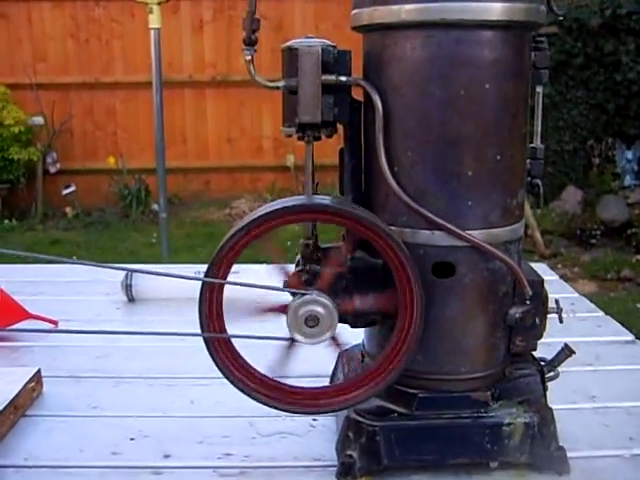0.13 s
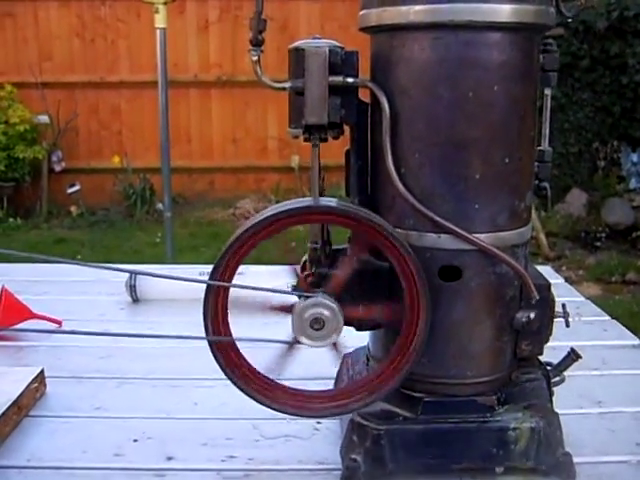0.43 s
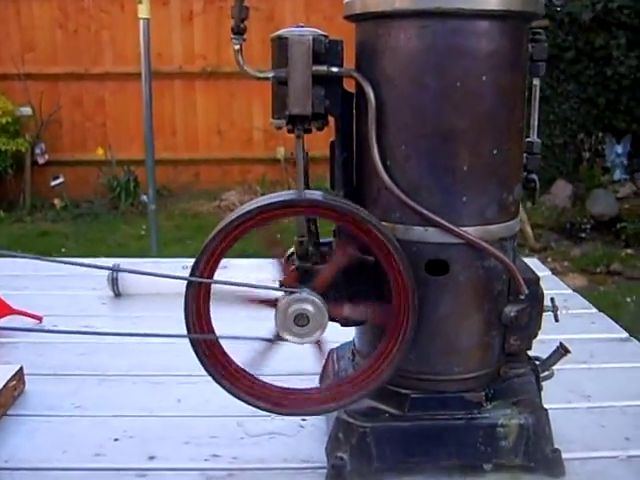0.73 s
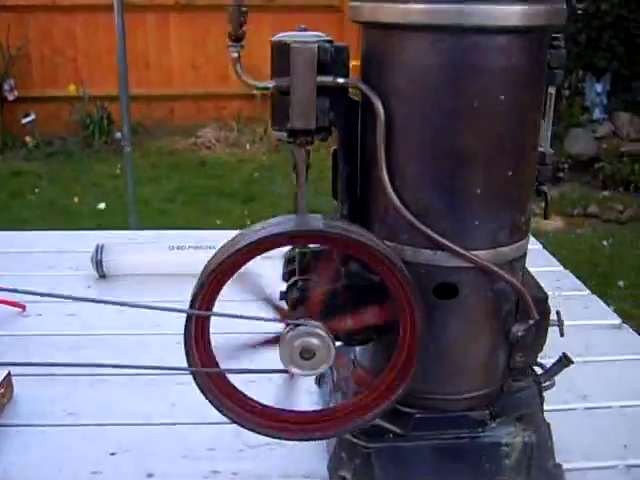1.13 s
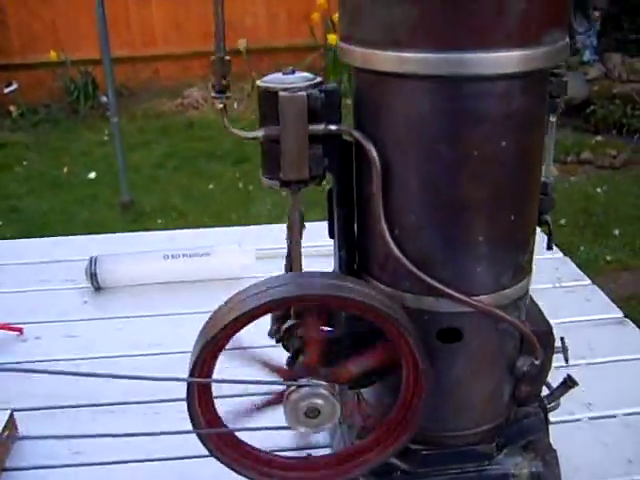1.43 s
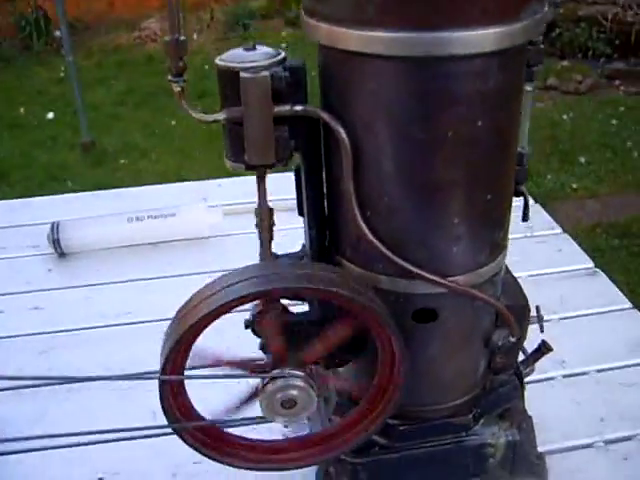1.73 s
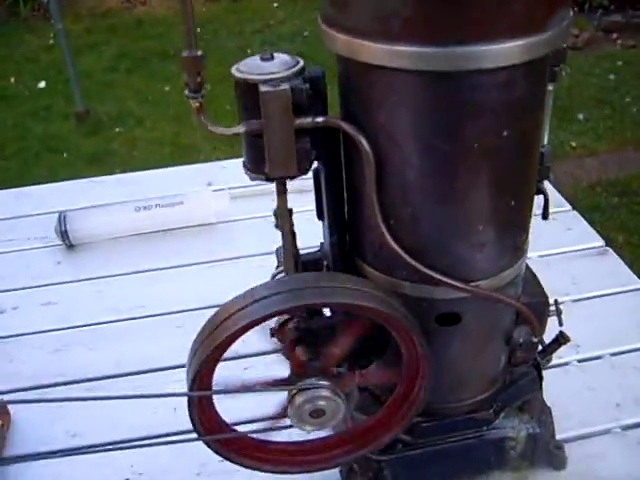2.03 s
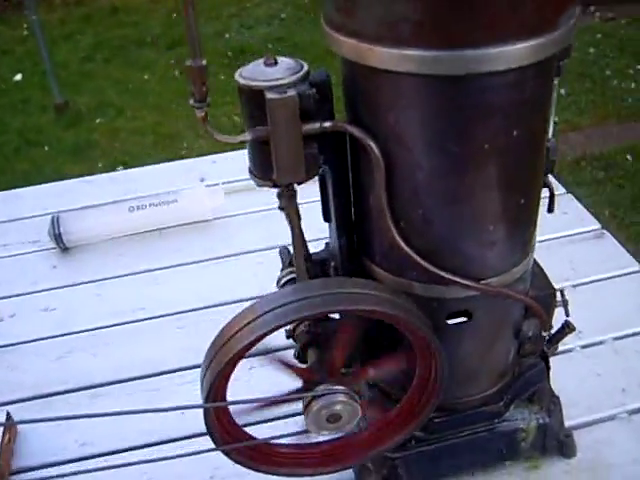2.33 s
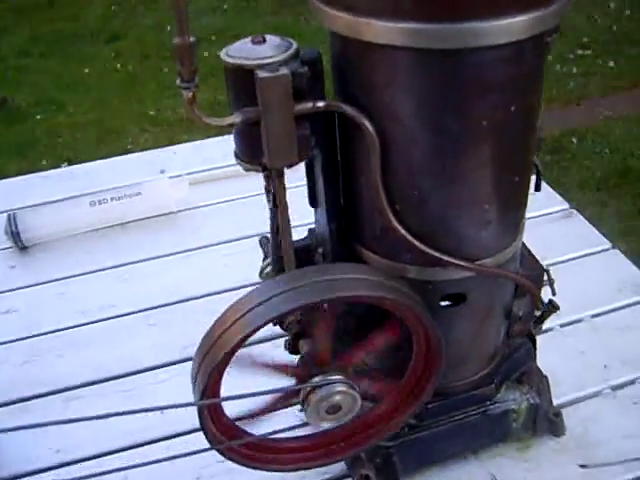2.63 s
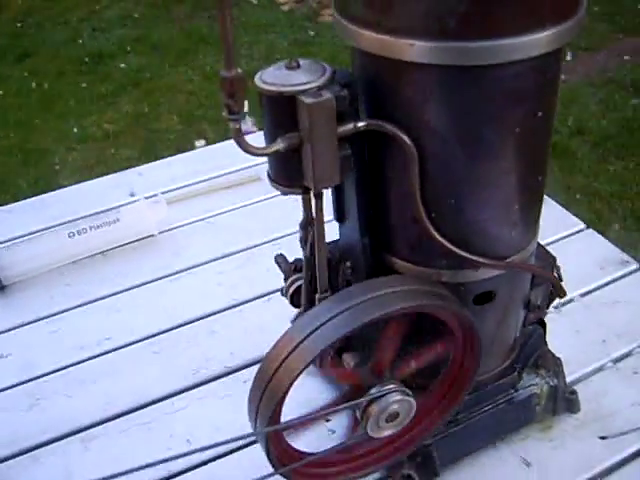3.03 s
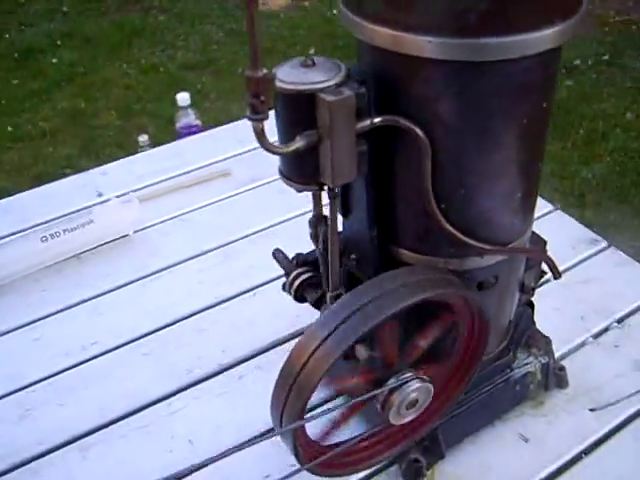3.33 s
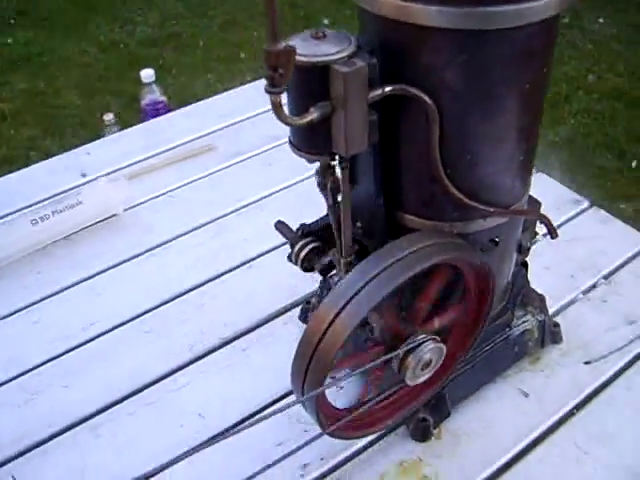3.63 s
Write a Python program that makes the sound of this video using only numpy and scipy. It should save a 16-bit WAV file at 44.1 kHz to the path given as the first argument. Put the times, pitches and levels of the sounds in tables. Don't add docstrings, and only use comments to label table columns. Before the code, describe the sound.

Fast steam puffs from a little engine on a garden table, ticking, clacking and softly droning.

```python
import sys
import numpy as np
from scipy import signal
from scipy.fft import rfft, irfft, next_fast_len
from scipy.io import wavfile
from scipy.ndimage import uniform_filter1d, map_coordinates

SR = 44100
rng = np.random.default_rng(int(sys.argv[2]) if len(sys.argv) > 2 else 0)


def natural_amplitude(level_db):
    exponent = np.asarray(level_db, float) / 20
    return 10 ** exponent


def output_pcm(signal):
    pcm = np.clip(np.atleast_2d(signal).T, -1, 1) * 32767
    wavfile.write(sys.argv[1], SR, np.round(pcm).astype(np.int16))


N = 166257

# time [s], turn_count [turns]
CRANK = [(0, -.18), (.3983, 4), (1.3468, 14), (2.2842, 24), (3.4963, 37), (3.77, 39.94)]


def unit(x):
    return x / np.sqrt(np.mean(x ** 2) + 1e-20)


def along(points, hz):
    point_hz, value = np.transpose(points)
    return np.interp(np.log(hz + 1), np.log(point_hz + 1), value)


def slopes(points):
    return lambda hz: natural_amplitude(along(points, hz))


def bands(rows):
    def gain(hz):
        hz = np.minimum(hz, 7650)
        return np.sqrt(sum(natural_amplitude(2 * db) / (1 + (2 * (hz - centre) / wide) ** 2) ** 2
                           for centre, wide, db in rows))
    return gain


def curves(rows):
    s, *columns = np.transpose(rows)
    return [np.interp(np.arange(N) / SR, s, column) for column in columns]


def wobble(rate):
    return map_coordinates(rng.standard_normal(size=4000), [np.arange(N) * rate / SR])


def filtered(x, response):
    m = next_fast_len(N + SR // 2)
    return irfft(rfft(x, m) * response(np.fft.rfftfreq(m, 1 / SR)), m)[..., :N]


def rush(spectrum, patchy_db, tilt_db=0):
    z = signal.stft(rng.standard_normal(N), nperseg=256)[2]
    patches = uniform_filter1d(uniform_filter1d(rng.standard_normal(z.shape), 3, 0), 5, 1)
    noise = signal.istft(z * natural_amplitude(patchy_db * unit(patches)), nperseg=256)[1][:N]
    return unit(filtered(noise, lambda hz: spectrum(hz) * natural_amplitude(tilt_db * np.log2((hz + 1) / 4000))))


def snap(size):
    noise = rng.standard_normal(size + 8)
    return np.convolve(noise, [1, 1, 1, 0, -1, -1, -1], 'valid')[:size] / 2


def strikes(rows, modes, crack, crack_s=0.012, glide=0, rise_s=0.00047, glide_s=0.0009):
    out, t = np.zeros(N + SR), np.arange(SR // 10) / SR
    bent_t = t + glide * glide_s * (1 - np.exp(-t / glide_s))
    for s, db in rows:
        draw = rng.standard_normal((len(modes), 2))
        blow = crack * natural_amplitude(-60 * t / crack_s) * snap(len(t))
        for (hz, mode_db, t60), (louder, sharper) in zip(modes, draw):
            fade = natural_amplitude(mode_db + 2.0 * louder - 60 * t / t60)
            blow += fade * np.sin(2 * np.pi * hz * (1 + 0.019 * sharper) * bent_t)
        blow *= 1 - np.exp(-t / rise_s)
        out[max(round(s * SR), 0):][:len(t)] += natural_amplitude(db) * blow / np.abs(blow).max()
    return out[:N]


def port(turns, opens, opening, shuts, shutting, sag_db):
    u = turns - opens + 2
    since_open, span = u % 1, shuts - opens
    closing = 1 - (since_open - span) / shutting
    gate = np.clip(np.minimum(since_open / opening, closing), 0, 1) ** 2
    scatter_db = 0.8 * rng.standard_normal(50)[u.astype(int)]
    return gate * natural_amplitude(-sag_db * since_open / span + scatter_db)


def steam():
    # time [s], level [dB], weak_puff [dB], camera_angle [0 front - 1 - 2 side - 3 back]
    heard = [(0, -43.5, -3, 0.065), (.6, -44.5, -1.5, 0.14), (1.0, -43.5, -4.5, 0.028),
             (1.35, -43.5, -2.5, 0.14), (1.55, -44, -5.5, 0.67), (1.7, -44.5, -4, 1.1),
             (1.85, -43, -6.5, 0.96), (2.3, -44.5, -5, 1.48), (2.55, -44.5, -3, 1.64),
             (2.9, -44, -4.5, 2.1), (3.15, -41, -5.5, 2.58), (3.4, -42, -6.5, 2.82), (3.77, -40, -7, 2.9)]
    # opens_at [turn], opening [turns], shuts_at [turn], shutting [turns], sag [dB]
    strong_port = (0.81, 0.029, 1.179, 0.051, 1.1)
    weak_port = (0.3, 0.054, 0.66, 0.098, 5.7)
    # pitch [Hz], width [Hz], level [dB]
    front = [(1830, 360, -10), (3160, 480, -2), (3726, 610, 1.5), (4190, 490, -5), (5370, 410, -9.5),
             (6375, 830, -2), (7650, 430, -8)]
    half = [(1940, 290, -9), (3053, 890, 1), (4180, 600, -5), (5190, 990, -2), (6250, 810, -11),
            (7150, 1060, 0)]
    side = [(2070, 230, -12.5), (2910, 780, -5.5), (4090, 920, -9.5), (5100, 1100, -6.5), (6590, 770, 1.5),
            (7328, 516, -2.5)]
    back = [(2020, 390, -11), (2860, 650, -4.5), (3300, 330, -7), (4180, 610, -8), (5070, 700, -4.5),
            (5870, 580, -10), (6560, 490, -3), (6980, 660, -3), (7451, 417, 1.5)]
    # pitch [Hz], level [dB per Hz]
    chuff_body = [(210, -32), (350, -9), (432, -9), (485, -3.5), (599, -1.5), (1020, -1.5), (1110, -1.5),
                  (2600, -9), (3380, -38.5), (5720, -120)]

    turns, = curves(CRANK)
    level_db, weak_db, angle = curves(heard)
    angle = np.clip(angle, 0, 3)
    shares = [np.sqrt(np.clip(1 - np.abs(angle - view), 0, 1)) for view in range(4)]

    def jet(tilt_db):
        return sum(share * rush(bands(colour), 0.5, tilt_db)
                   for share, colour in zip(shares, (front, half, side, back)))

    strong, weak = port(turns, *strong_port), port(turns, *weak_port)
    spit = natural_amplitude(1.7 * np.clip(wobble(700), -2, 2) + 0.7 * wobble(120))
    leak_db, weak_tilt_db = -21.5, -2
    hiss = spit * (strong * jet(0) + (weak * natural_amplitude(weak_db) + natural_amplitude(leak_db)) * jet(weak_tilt_db))
    flow = 1 + strong + 1.1 * weak
    chuff = unit(flow * natural_amplitude(1.7 * wobble(150)) * rush(slopes(chuff_body), 1.7))
    return natural_amplitude(level_db + 2.0) * hiss + natural_amplitude(-58) * chuff


def drone():
    # time [s], speed [turns per s]
    shaft_speed = [(0, 16.28), (.65, 16.26), (1.8, 16.15), (3.05, 16.09), (3.77, 16.07)]
    # time [s], nearness [0-1]
    nearness = [(0, 0.03), (.65, 0), (1.2, 0.43), (1.8, 0.76), (2.4, 0.8), (3.05, 1), (3.77, 0.82)]
    # multiple [of shaft speed], level [dB]
    far_orders = [(1, -19), (2, -18), (3, -13), (4, 1), (5, -9.5), (6, -13), (7, -14), (8, -3), (9, -12.5),
                  (10, -13.5), (11, -16), (12, -1), (13, -5), (14, -5), (15, -5.5), (16, -1.5), (17, -14.5),
                  (18, 1.5), (19, -5.5), (20, -2), (21, -3), (22, -21), (23, -5), (24, -9.5)]
    near_orders = [(1, -28), (2, -29), (3, -25), (4, -13), (5, -19), (6, -25), (7, -26), (8, -15.5),
                   (9, -20), (10, -19.5), (11, -15.5), (12, -6.5), (13, -9.5), (14, -6.5), (15, -9),
                   (16, 0.5), (17, -17.5), (18, -9), (19, -2.5), (20, -15.5), (21, -11), (22, -19),
                   (23, -14), (24, -21)]
    # pitch [Hz], level [dB per Hz]
    table_rumble = [(12, -43), (20, -17), (54, 1), (151, -7.5), (195, 3.5), (303, 0), (426, -2.5),
                    (492, 3.5), (600, -12), (780, -39), (1320, -120)]
    # pitch [Hz], level [dB]
    distant_hum = [(470, -64), (441, -70)]

    (speed,), (near,) = curves(shaft_speed), curves(nearness)
    near = np.clip(near, 0, 1)
    shaft_angle = 2 * np.pi * np.cumsum(speed) / SR
    hum = np.zeros(N)
    for (k, far_db), (_, close_db) in zip(far_orders, near_orders):
        hum_db = (1 - near) * (far_db - 69.5) + near * (close_db - 58.5) + 0.9 * wobble(3.455)
        hum += natural_amplitude(hum_db) * np.sin(k * shaft_angle + 1.35 * k * k)

    hoot_s, rise_s, sag_hz_per_s = 3.2, 0.3, 11
    t = np.arange(N) / SR - hoot_s
    hoot = sum(natural_amplitude(db + 0.8 * wobble(8.2)) * np.sin(2 * np.pi * (hz - sag_hz_per_s * t / 2) * t)
               for hz, db in distant_hum)
    hoot = np.clip(t / rise_s, 0, 1) * hoot
    rumble = natural_amplitude(-69.5 + 7 * near + 0.85 * wobble(5.6)) * rush(slopes(table_rumble), 0.96)
    return hum + hoot + rumble


def pops():
    # time [s], peak [dB], low_thud [dB]
    slugs = [(0.002, -29, -7.5), (0.0501, -24.5, -12.5), (0.0567, -29, -13), (0.0995, -31.5, -2),
             (0.1449, -23, -11.5), (0.1955, -25, -13), (0.2095, -35, -14), (0.2568, -35, -12),
             (0.7634, -20.5, -21), (0.786, -33, -20), (0.9586, -30.5, -22), (1.0558, -32, -15),
             (1.3538, -27, -16)]
    # pitch [Hz], level [dB], fade_t60 [s]
    nozzle = [(3250, -5, .006), (3750, 0, .008), (4250, -5, .006), (5300, -13, .004), (7300, -12, .004)]
    chimney = [(840, 2, 0.008), (1280, 1.5, 0.0097), (1560, -0.5, 0.008)]
    snaps = [(s, db - 5.5) for s, db, _ in slugs]
    thuds = [(s, db + thud_db - 0.5) for s, db, thud_db in slugs]
    return (strikes(snaps, nozzle, crack=0.19, crack_s=0.0038, rise_s=0.0005)
            + strikes(thuds, chimney, crack=0.069))


def crank():
    # pitch [Hz], level [dB], fade_t60 [s]
    bearing = [(906.5, 0, 0.03), (1037.6, -1, 0.034), (1403, -9, 0.012), (2040, -10, 0.008)]
    valve_gear = [(2106, 1.5, 0.023), (1870, 0, 0.018)]
    whistle = [(850, 0, .014)]
    pinched_steam = [(2790, 0, .02)]
    # time [s], level [dB]
    squeak_heard = [(0, -7), (.9, -4), (1.3, -3), (1.95, -4), (2.2, -5), (3.77, -9)]
    # time [s], peak [dB]
    loud_chirps = [
        (0.5526, -53),
        (1.8243, -44),
        (1.919, -41),
        (2.377, -46),
        (2.9442, -42.5),
        (3.016, -51),
        (3.4057, -45),
    ]

    s, turns = np.transpose(CRANK)
    k, scatter = np.arange(40), rng.standard_normal((40, 5))

    def at(turn):
        return np.interp(k + turn, turns, s)

    facing_db = 3.5 * (np.clip(k / 14, 0, 1) - 1)
    heard_db = np.interp(at(0), *np.transpose(squeak_heard))
    knocks = zip(at(0.243), -41 + facing_db + 1.5 * scatter[:, 0])
    ticks = zip(at(0.635), -46 + 1.5 * scatter[:, 1])
    chirps = zip(at(0.075), -50 + 2.5 * scatter[:, 2])
    squeaks = zip(at(0.228), -40.5 + heard_db + 2.5 * scatter[:, 3])
    pinches = zip(at(0.17), -47 + 2 * facing_db + 1.5 * scatter[:, 4])
    return (strikes(squeaks, whistle, crack=0.22, crack_s=0.0079, glide=2.4, glide_s=0.002, rise_s=0.0014)
            + strikes(pinches, pinched_steam, crack=0.3, rise_s=0.001)
            + strikes(knocks, bearing, crack=0.55, glide=0.3, rise_s=0.0009)
            + strikes(ticks, bearing, crack=1.0)
            + strikes([*chirps, *loud_chirps], valve_gear, crack=0.35, rise_s=0.0022))


def belt():
    # time [s], peak [dB], rebound_after [s], clip_ring [dB]
    pulley_hits = [
        (0.2842, -33.5, 0.013, -18),
        (0.8705, -34.5, .012, -16),
        (1.4612, -37, .011, -4),
        (2.0438, -32.5, .011, -5),
        (2.6155, -31, .012, -13),
        (3.1887, -29, .0105, -6),
        (3.7605, -33.5, .011, -12),
    ]
    # time [s], peak [dB]
    rim_hits = [
        (0.4858, -25),
        (1.0807, -25.5),
        (1.6688, -25.5),
        (2.2371, -27.5),
        (2.8191, -25.5),
        (3.383, -23.5),
    ]
    # pitch [Hz], level [dB], fade_t60 [s]
    frame_modes = [(562, -7, 0.028), (620, -5, 0.03), (715, -8, 0.014), (1050, -14, .01),
                   (1393, -11, 0.014), (1650, -14, .01), (1960, -9, .013), (2150, -11, .01),
                   (2850, -11, 0.01)]
    clip_modes = [(5820, -2, 0.0077), (6170, -4, .01)]
    rim_modes = [(627, -14, 0.027), (2110, -3, 0.013), (2697, 3.5, 0.008), (3250, -1.5, 0.0093),
                 (4740, -2.5, 0.0067), (5850, 0.5, 0.0075), (7080, -9.5, 0.0068)]

    thumps = [(s + k * gap_s, db + 0.5 - 3 * k * k, clip_db)
              for s, db, gap_s, clip_db in pulley_hits for k in range(3)]
    clacks = [(s + k * 0.002, db - 0.5 - 6 * k) for s, db in rim_hits for k in range(2)]
    thuds = [(s, db) for s, db, _ in thumps]
    clip_rings = [(s, db + clip_db) for s, db, clip_db in thumps]
    return (strikes(thuds, frame_modes, crack=0.67, rise_s=0.0018)
            + strikes(clip_rings, clip_modes, crack=0, rise_s=0.00058)
            + strikes(clacks, rim_modes, crack=1.0, crack_s=0.0098, rise_s=0.0008))


def garden(x):
    # pitch [Hz], fade_t60 [s]
    echo_fade = [(200, 0.04), (2000, 0.066), (8000, 0.028)]
    hz, t, z = signal.stft(rng.standard_normal(SR // 4), SR, nperseg=256)
    fade = natural_amplitude(-60 * t / along(echo_fade, hz)[:, None])
    tail = signal.istft(z * fade, SR, nperseg=256)[1]
    return signal.fftconvolve(np.pad(x, (120, 0)), tail / np.linalg.norm(tail))[:N]


def scene():
    hits = crank() + belt() + pops()
    return (steam() + hits + natural_amplitude(-13.5) * garden(hits) + natural_amplitude(2.5) * drone())[None]


def top_cut(x):
    return signal.sosfilt(signal.butter(12, 8900, fs=SR, output="sos"), x)


def record(dry):
    # pitch [Hz], gain [dB]
    mic_gain = [(52, -2), (61, 1), (5550, 2), (5900, 0), (6250, 1), (7650, 3), (8450, -25), (8900, -70)]
    return top_cut(filtered(dry, slopes(mic_gain)))


dry = scene()
out = record(dry)
output_pcm(out)
```